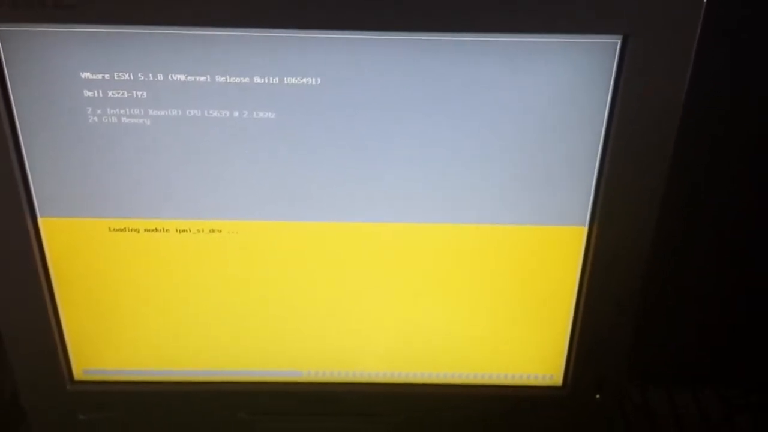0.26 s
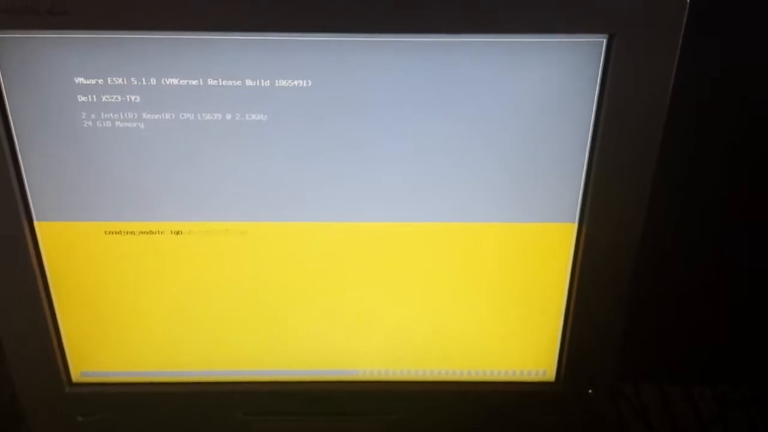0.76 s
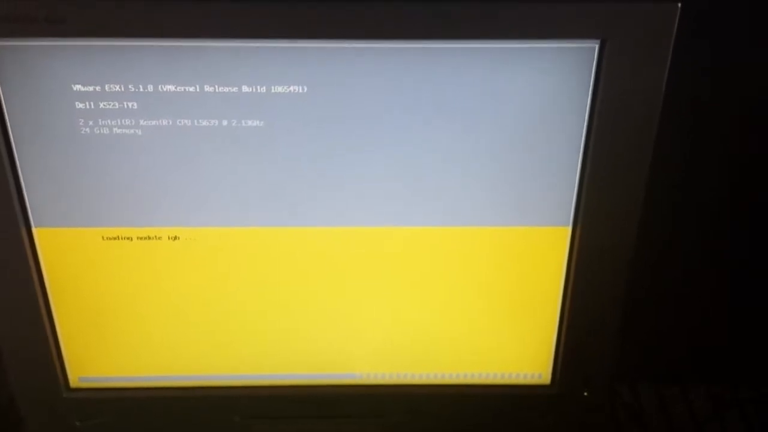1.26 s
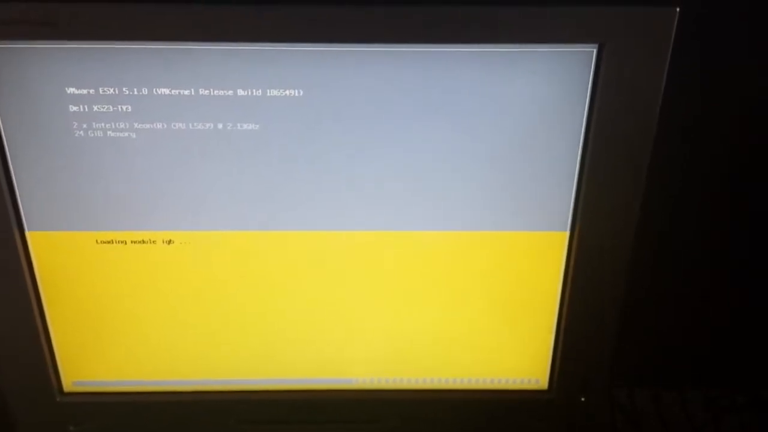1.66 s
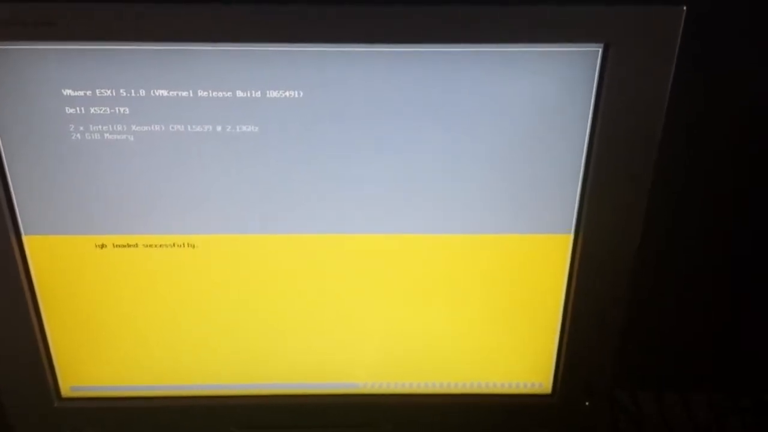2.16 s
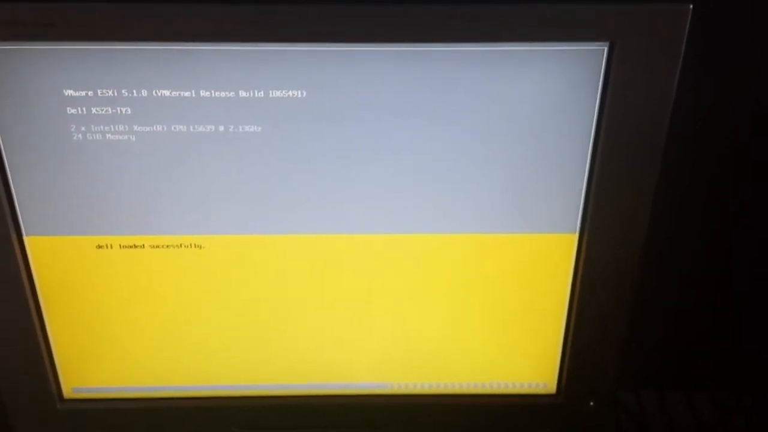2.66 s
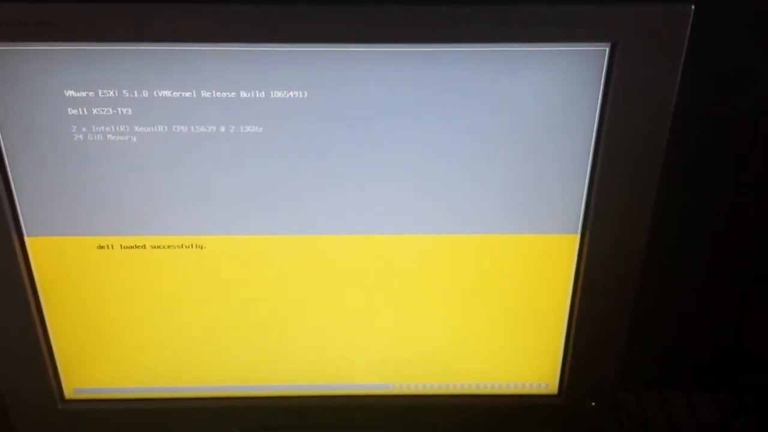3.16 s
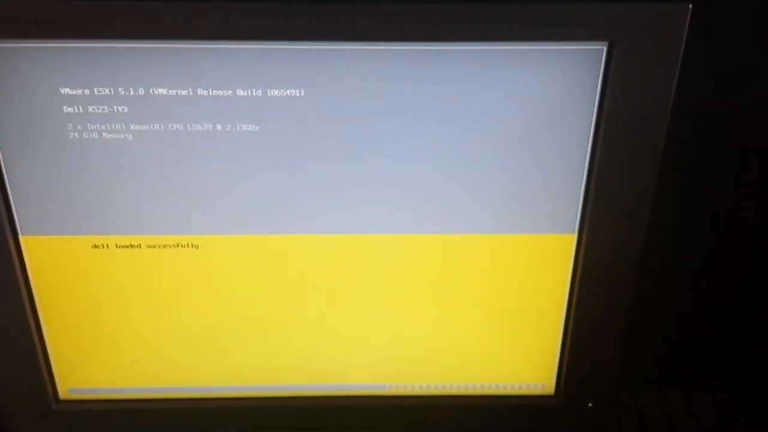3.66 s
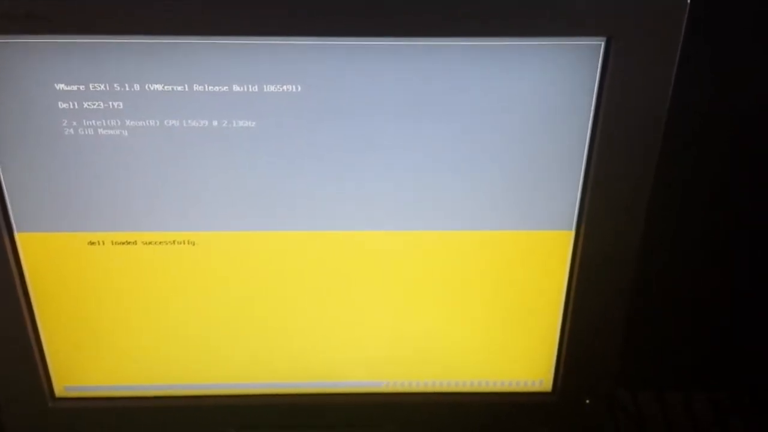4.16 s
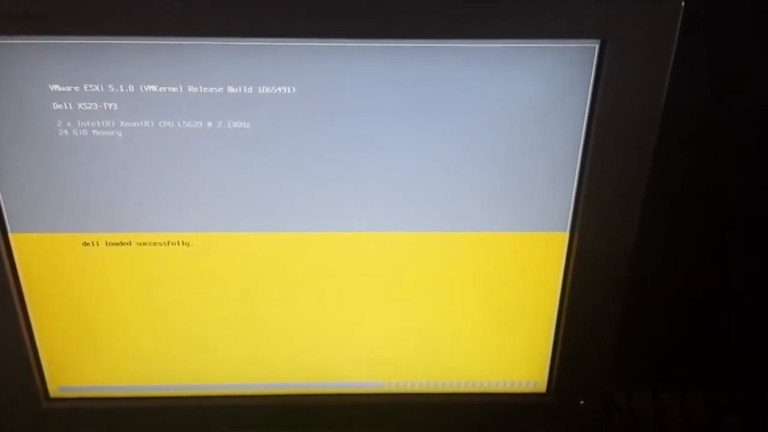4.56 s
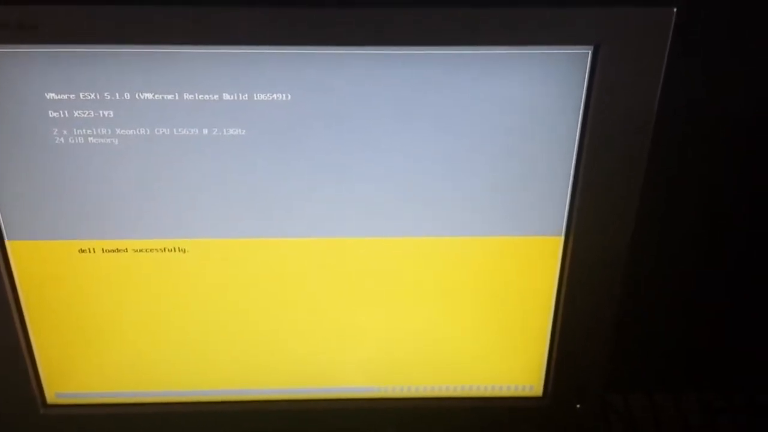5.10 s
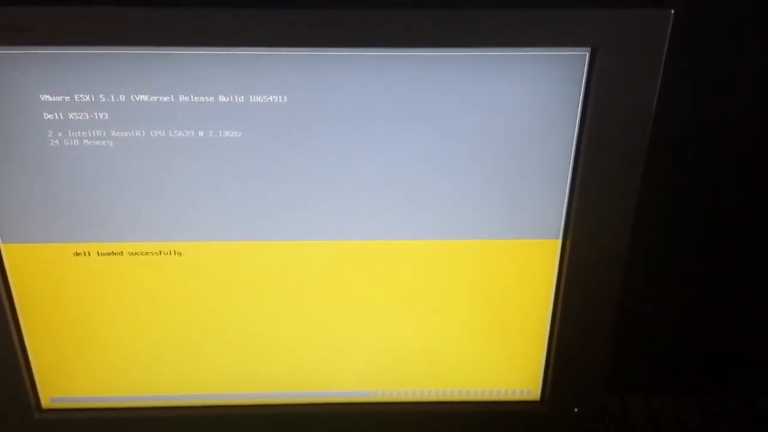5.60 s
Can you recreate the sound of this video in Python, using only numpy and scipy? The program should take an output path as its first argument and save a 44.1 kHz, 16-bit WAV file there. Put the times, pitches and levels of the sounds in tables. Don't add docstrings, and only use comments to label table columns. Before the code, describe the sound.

Small server fans blow a steady rush of air with beating whines, cut by a brief dropout before swelling back.

```python
import sys
import numpy as np
from scipy import signal
from scipy.fft import rfft, irfft, next_fast_len
from scipy.io import wavfile

SR = 44100
rng = np.random.default_rng(int(sys.argv[2]) if len(sys.argv) > 2 else 0)


def volts(x):
    e = np.asarray(x, float) / 20
    return 10 ** e


def persist_wave(psi):
    counts = np.round(np.clip(psi, -1, 1) * 32767).astype(np.int16)
    wavfile.write(sys.argv[1], SR, np.atleast_2d(counts).T)


N = 257365

# pitch_hz, level_db (per Hz)
AIR_RUSH = [(25, -99), (50, -89), (85, -77), (200, -67.5), (400, -60.5), (650, -62), (1200, -67),
            (2300, -72), (5000, -72), (7000, -76.5), (8000, -83.5), (9600, -91), (11300, -95.5),
            (14000, -106)]
# pitch_hz, width_hz, level_db
CASE_LEFT = [(84, 8, 6.5), (229.6, 36, 3), (261, 20, -3.5), (290.5, 14, 4), (356.4, 23, 3.5),
             (392.5, 64, 6.5), (463, 26, -5), (533, 99, 6), (648, 60, -6.5), (845, 30, 4), (1091, 47, 4.5),
             (1209, 20, 6.5), (1200, 53, -0.5), (1500, 80, 4), (1645, 70, 10.5), (1668, 95, -4.5),
             (1800, 58, 6.5), (2240, 150, 4.5), (3000, 180, 1.5), (3635, 140, 3), (3900, 150, 1),
             (4480, 170, 2), (5460, 350, 4), (5970, 140, 3.5), (6395, 430, 6.5), (7020, 220, 2),
             (7260, 250, 3.5), (8600, 360, 2)]
# pitch_hz, width_hz, level_db
CASE_RIGHT = [(87, 24, 3), (234, 32, 7.5), (267, 13, -9), (360, 76, 9.5), (445, 45, -7), (470, 100, 4.5),
              (590, 47, -3), (740, 63, 2), (963, 46, 6), (1127, 77, 8), (1155, 45, -21), (1370, 330, -1),
              (1610, 230, 5), (2230, 230, 6.5), (3040, 78, 6.5), (3530, 100, 2.5), (4160, 240, 4.5),
              (5800, 1400, 0)]
# pitch_hz, level_db
RIGHT_TILT = [(60, 2.5), (300, -0.5), (1000, 0.5), (6500, -2), (8000, 7.5), (9900, 9), (10900, 3),
              (13500, 8)]
# pitch_hz, likeness_0_to_1, extra_right_lead_radians
MIC_PAIR = [(35, .76, 0), (390, .985, -.5), (560, .9, -.3), (1150, .42, -1.15), (1700, .63, .35),
            (2050, .3, .5), (5500, .26, .1), (9000, .06, .5)]
SHAFT_HZ = (79.638, 79.638, 78.78, 73.2)
# left_level_db, right_level_db
FAN_TONES = [
    {7: (-36, -37), 12: (-50, -54), 14: (-53, -56), 16: (-44.5, -44), 21: (-49, -54), 28: (-60, -62)},
    {4: (-51, -52), 6: (-58, -56), 7: (-36, -37), 8: (-52, -46), 12: (-44.5, -50), 14: (-58, -56)},
    {7: (-49, -47), 14: (-54, -54), 21: (-54, -64), 28: (-62, -66)},
    {7: (-52, -56)},
]
IN_STEP = {7: 0., 12: .051, 14: .05}
# pitch_hz, level_db
ROUNDING_STEP = [(100, -56), (500, -43), (3000, -42), (7000, -39.5), (9500, -36.5), (13000, -35)]

CUT_S, SILENT_S, BACK_S = 2.2915, 2.319, 2.4252


def at_hz(rows, hz, column=1):
    rows = np.array(rows)
    return np.interp(np.log(hz), np.log(rows[:, 0]), rows[:, column])


def drift(rate_hz):
    keep = np.exp(-80 * np.pi * rate_hz / SR)
    noise = rng.standard_normal(N // 40 + 4002)
    slow = signal.lfilter([1], [1, -2 * keep, keep * keep], noise)[4000:]
    slow = (slow - slow.mean()) / slow.std()
    return np.interp(np.arange(N) / 40, np.arange(len(slow)), slow)


def right_lead(hz):
    head_start_s = .00027
    return 2 * np.pi * hz * head_start_s + at_hz(MIC_PAIR, hz, column=2)


def colour_db(hz, case):
    level_db = at_hz(AIR_RUSH, hz)
    for centre_hz, width_hz, bump_db in case:
        level_db = level_db + bump_db / (1 + (2 * (hz - centre_hz) / width_hz) ** 2)
    return level_db


def air_rush(flutter_db):
    size = next_fast_len(N)
    hz = np.maximum(np.arange(size // 2 + 1) * SR / size, 1)
    shared, own = rfft(rng.standard_normal((2, size))) * np.sqrt(SR / 2)
    alike = np.clip(at_hz(MIC_PAIR, hz), 0, 1)
    right = alike * shared * np.exp(1j * right_lead(hz)) + np.sqrt(1 - alike ** 2) * own
    left_colour = volts(colour_db(hz, CASE_LEFT))
    right_colour = volts(colour_db(hz, CASE_RIGHT) + at_hz(RIGHT_TILT, hz))
    both = np.array([shared * left_colour, right * right_colour])
    out = np.zeros((2, N))
    edges_hz = [0, 300, 700, 1600, 3500, SR]
    for low, high in zip(edges_hz, edges_hz[1:]):
        band = irfft(both * ((hz >= low) & (hz < high)), size)[:, :N]
        out += band * volts(flutter_db * drift(2.5))
    return out


def second_fan_lead():
    t = np.arange(N) / SR
    early = -.255 + .2752 * t
    late = .876 + .2605 * (t - BACK_S)
    return np.where(t < SILENT_S, early, late)


def fan_tones(wobble_turns, waver_db):
    out = np.zeros((2, N))
    for fan, (shaft_hz, orders) in enumerate(zip(SHAFT_HZ, FAN_TONES)):
        turns = shaft_hz * np.arange(N) / SR + wobble_turns * drift(2.0)
        for order, levels_db in orders.items():
            ahead = second_fan_lead() - IN_STEP.get(order, 0) if fan == 1 else 0
            phase = 2 * np.pi * order * (turns + ahead) + order ** 2
            swelling_db = np.array(levels_db)[:, None] + waver_db * drift(1.5)
            height = np.sqrt(2) * volts(swelling_db)
            out += height * np.sin([phase, phase + right_lead(order * shaft_hz)])
    return out


def recorder_rounding(x, jitter_db, size=1024, grid=-60):
    n, k = np.arange(2 * size)[:, None], np.arange(size)
    window = np.sin(np.pi * (n + .5) / (2 * size))
    waves = window * np.cos(np.pi / size * (n + .5 + size / 2) * (k + .5))
    waves *= np.sqrt(2 / size)
    blocks = N // size + 3
    lead_in = 2 * size - grid
    padded = np.pad(x, ((0, 0), (lead_in, (blocks + 1) * size - N - lead_in)))
    halves = padded.reshape(2, -1, size)
    strengths = np.concatenate([halves[:, :-1], halves[:, 1:]], axis=2) @ waves
    by_band = np.repeat(rng.standard_normal((blocks, size // 32)), 32, axis=1)
    step = volts(at_hz(ROUNDING_STEP, (k + .5) * SR / (2 * size)) + jitter_db * by_band)
    rounded = np.floor((abs(strengths) / step) ** .75 + .4054) ** (4 / 3)
    frames = (np.sign(strengths) * rounded * step) @ waves.T
    out = frames[:, 1:, :size] + frames[:, :-1, size:]
    return out.reshape(2, -1)[:, size - grid:][:, :N]


def dip_db(since_s, depth_db, lasts_s):
    return depth_db * np.exp(-np.maximum(np.arange(N) / SR - since_s, 0) / lasts_s)


def scene():
    return air_rush(flutter_db=.6) + fan_tones(wobble_turns=.002, waver_db=.7)


def top_cut(x):
    return signal.sosfilt(signal.butter(12, 15000, fs=SR, output="sos"), x)


def record(dry):
    t = np.arange(N) / SR
    bass = signal.sosfiltfilt(signal.butter(2, 220, fs=SR, output="sos"), dry[0])
    bass_db = 1 + dip_db(BACK_S, depth_db=-10.5, lasts_s=.16)
    left = dry[0] + bass * (volts(bass_db) - 1)
    climb_db_per_s, climbed_s = 3.5, 3.67
    snap_db = dip_db(BACK_S, depth_db=-8.5, lasts_s=.03)
    gain_db = snap_db - climb_db_per_s * np.maximum(climbed_s - t, 0)
    coarser_db = .8
    pair = dry * (t < CUT_S) / volts(coarser_db)
    rounded = recorder_rounding(np.where(t < (CUT_S + BACK_S) / 2, pair, left), jitter_db=1.5)
    hiss_fade_s = .018
    before = volts(coarser_db) * np.clip((SILENT_S - t) / hiss_fade_s, 0, 1)
    after = (t >= BACK_S) * volts(gain_db)
    mix = rounded * (before + after)
    return top_cut(mix)


dry = scene()
out = record(dry)
persist_wave(out)
```